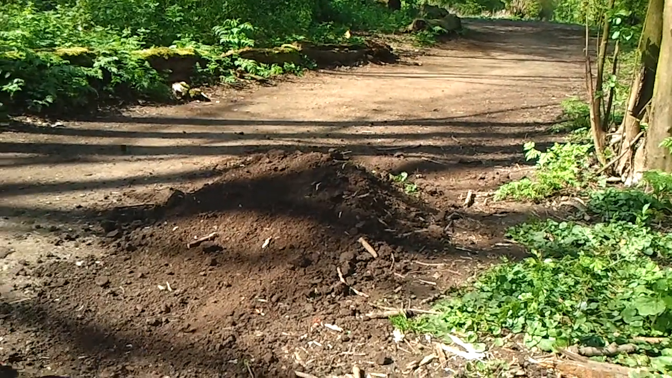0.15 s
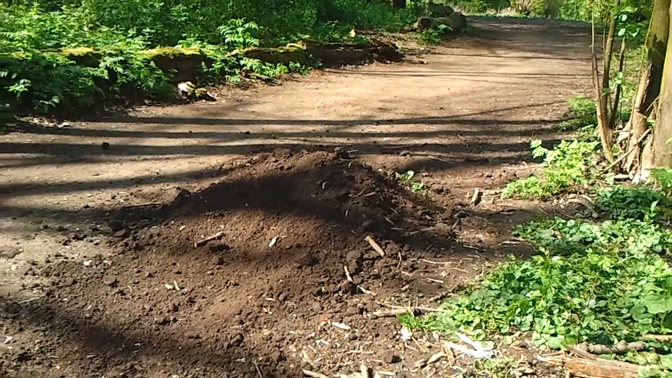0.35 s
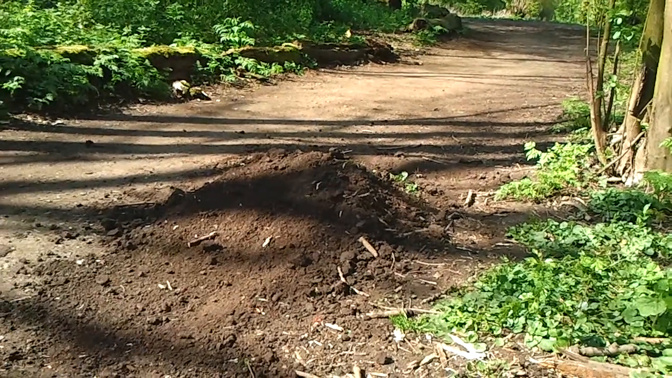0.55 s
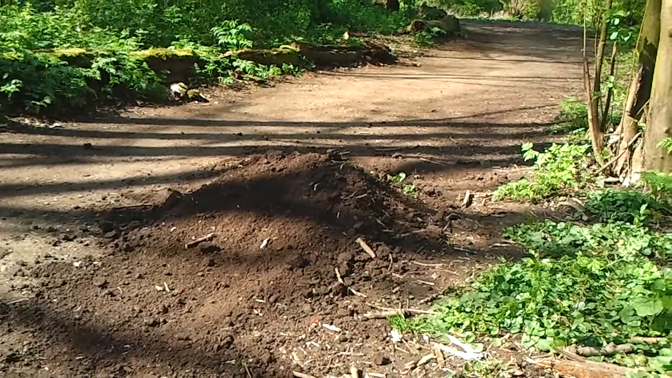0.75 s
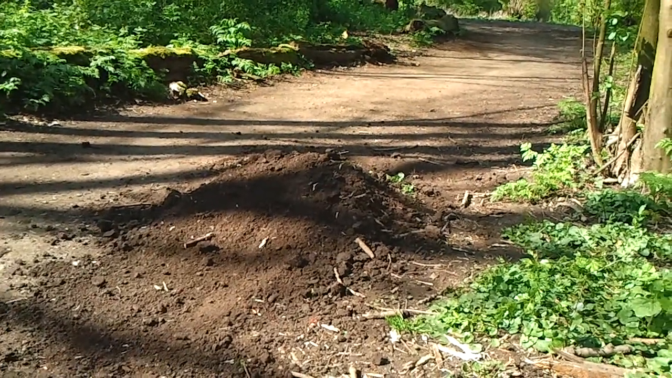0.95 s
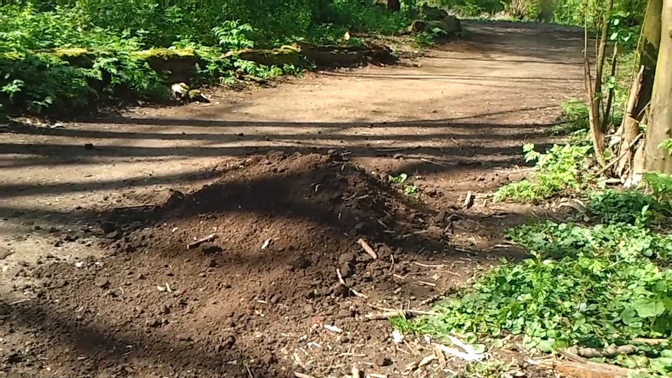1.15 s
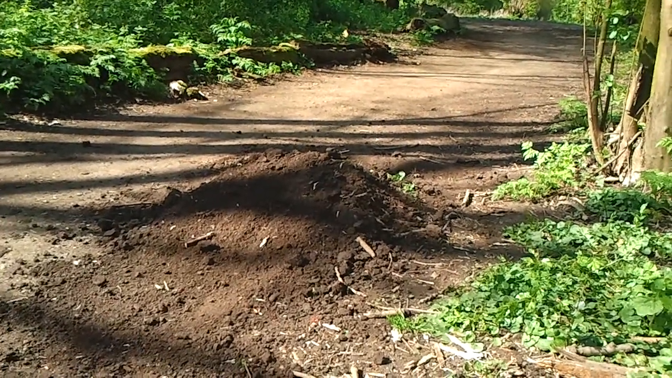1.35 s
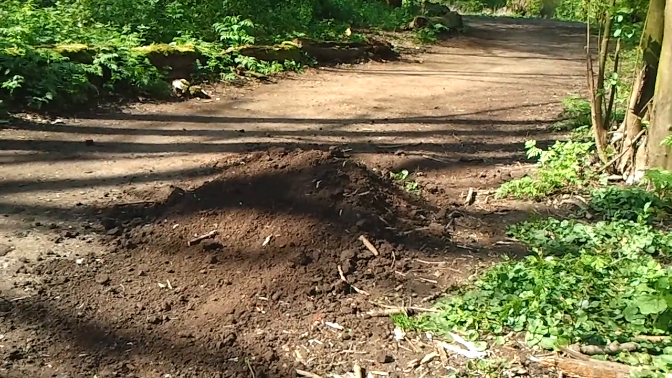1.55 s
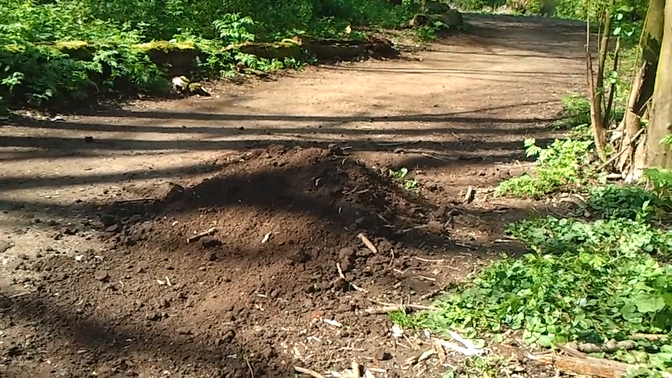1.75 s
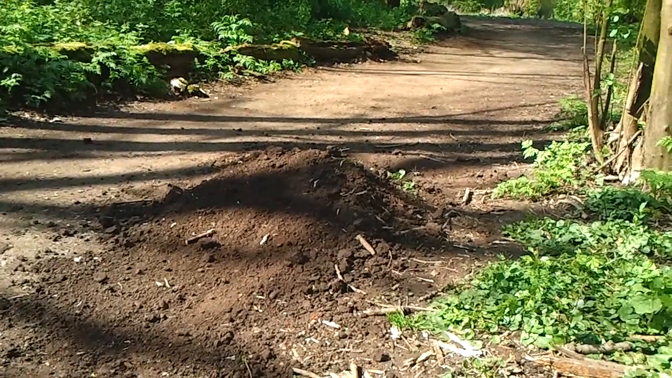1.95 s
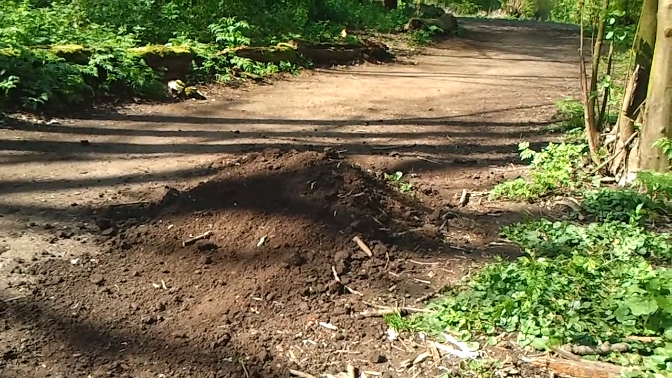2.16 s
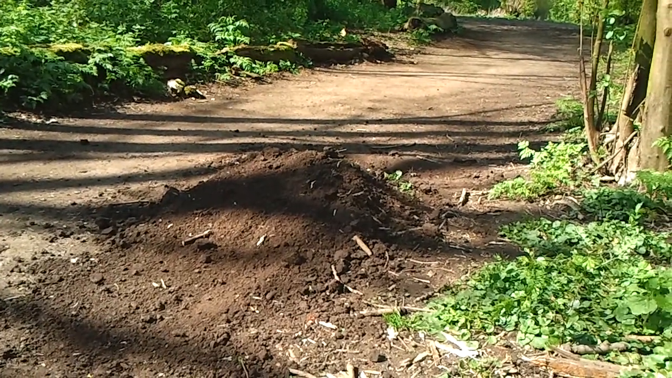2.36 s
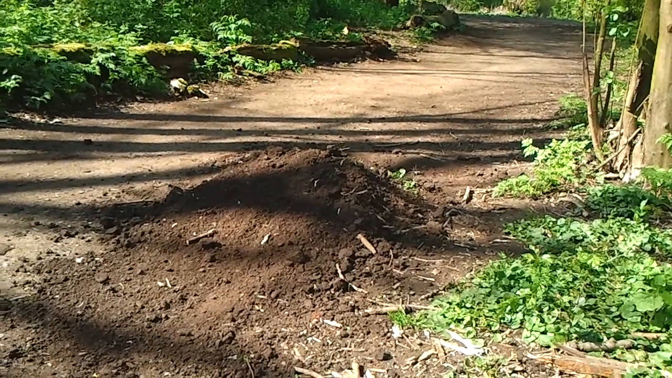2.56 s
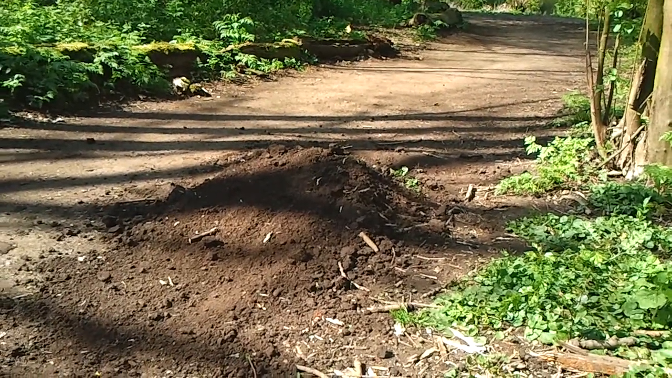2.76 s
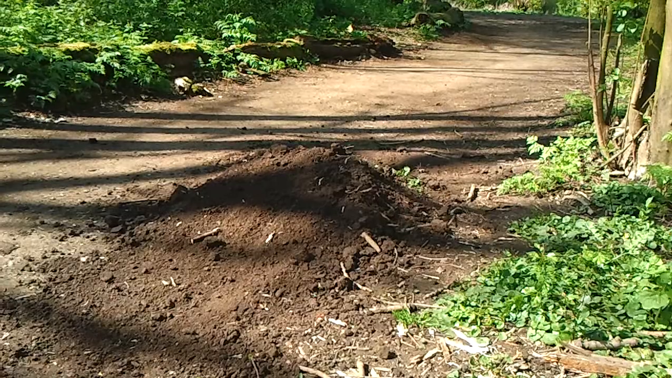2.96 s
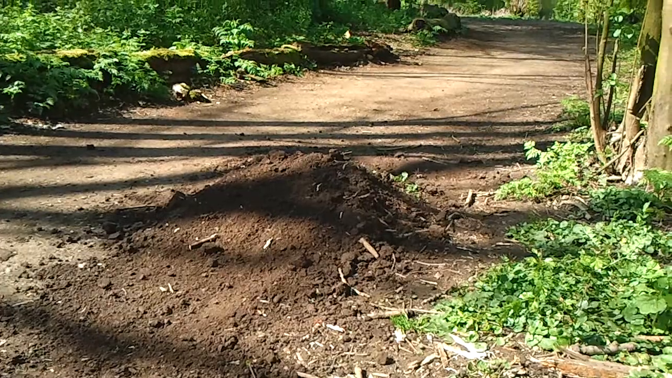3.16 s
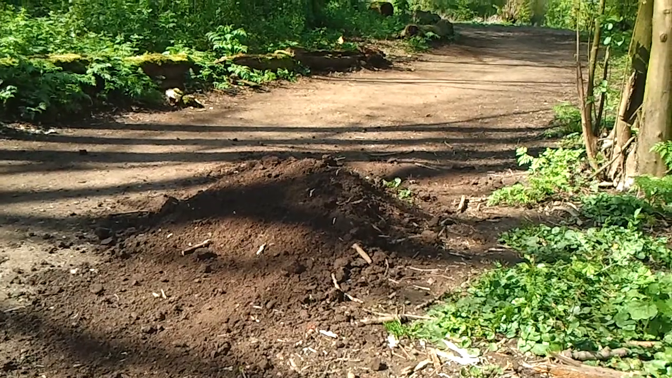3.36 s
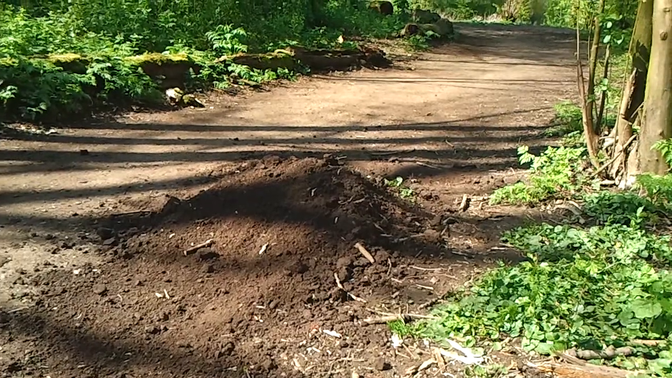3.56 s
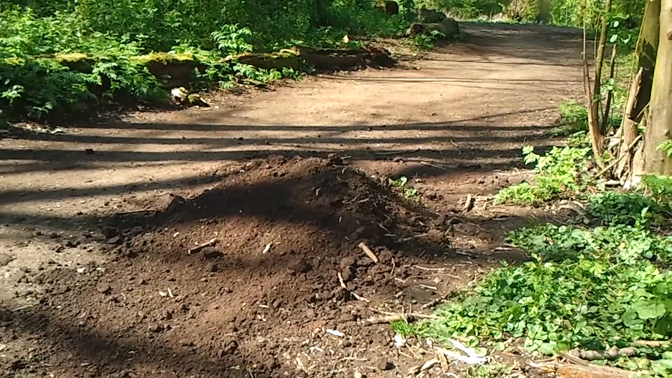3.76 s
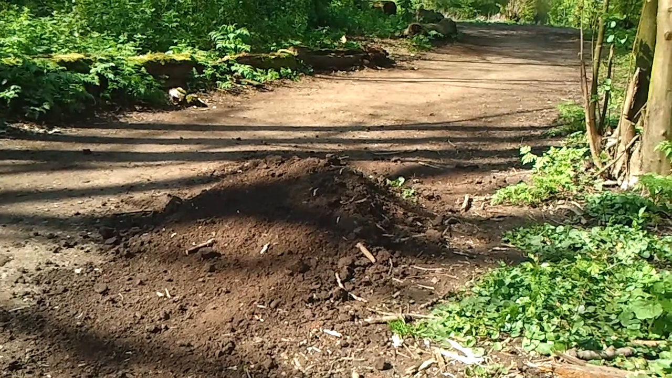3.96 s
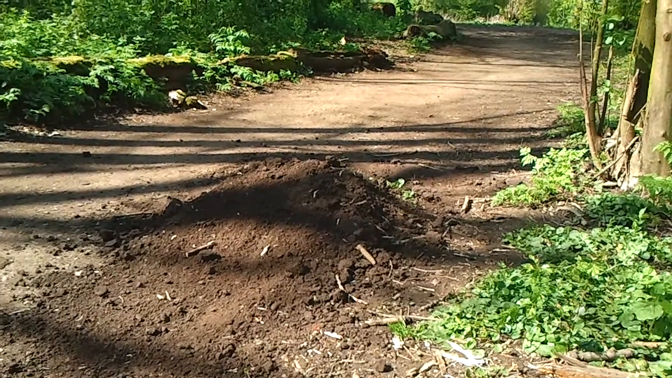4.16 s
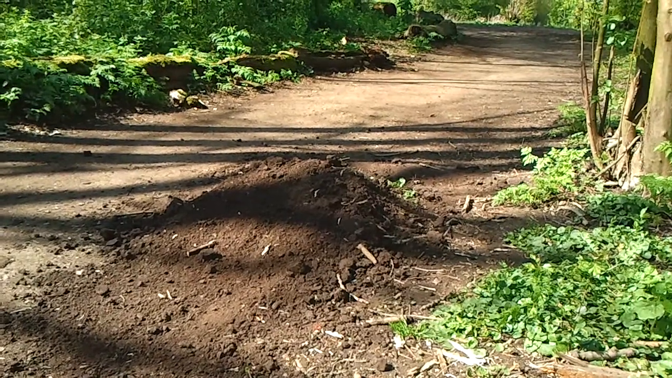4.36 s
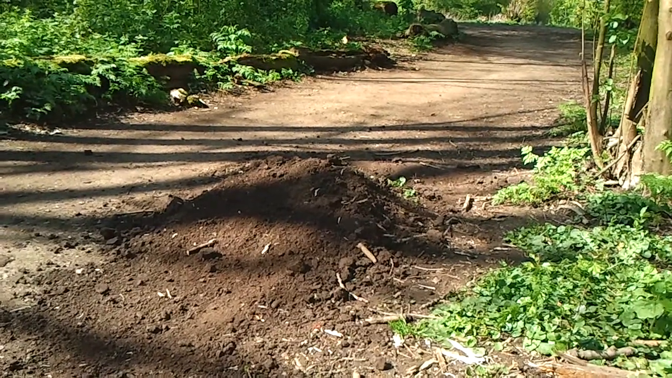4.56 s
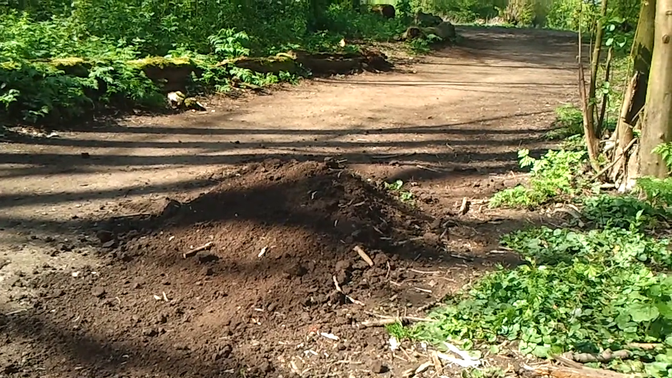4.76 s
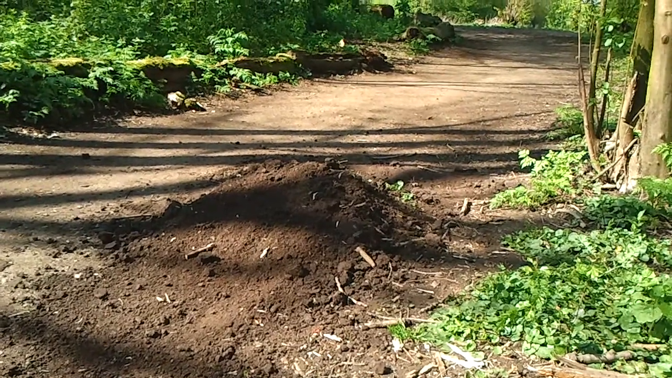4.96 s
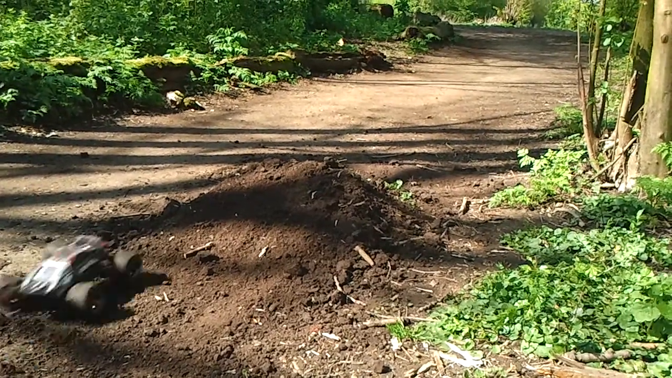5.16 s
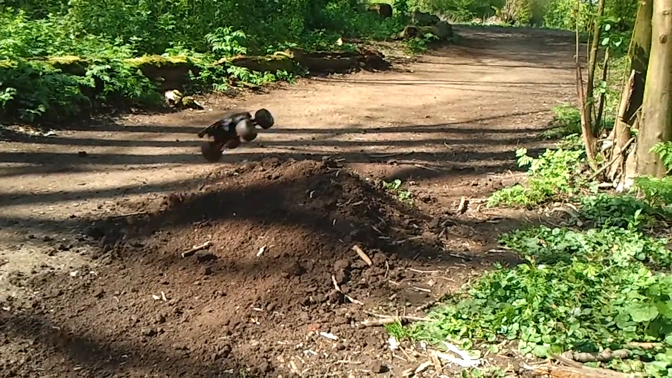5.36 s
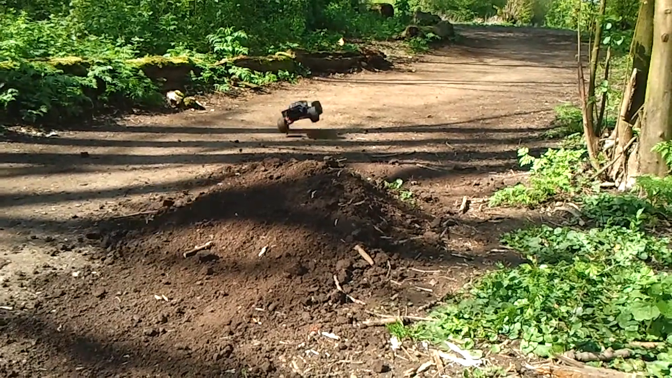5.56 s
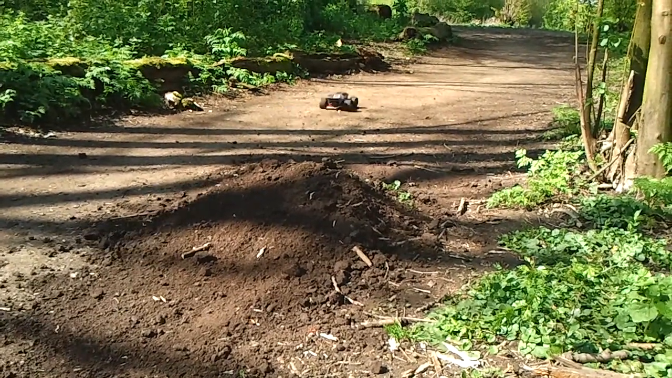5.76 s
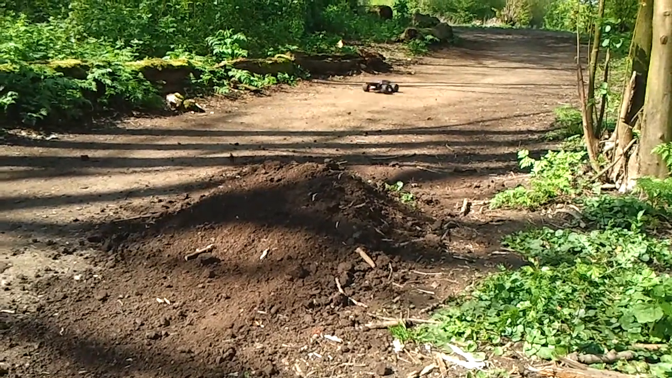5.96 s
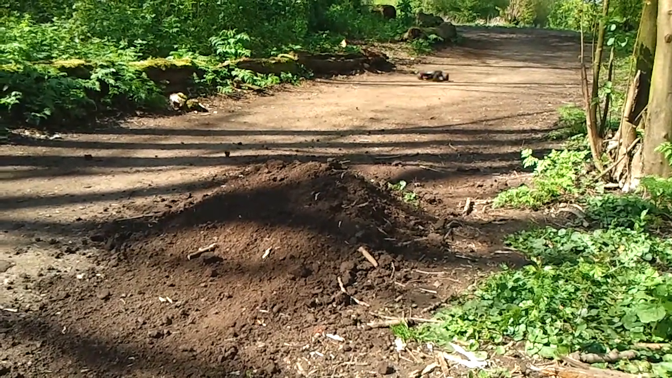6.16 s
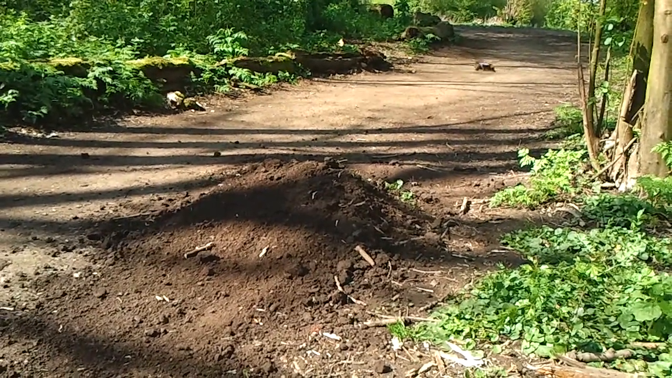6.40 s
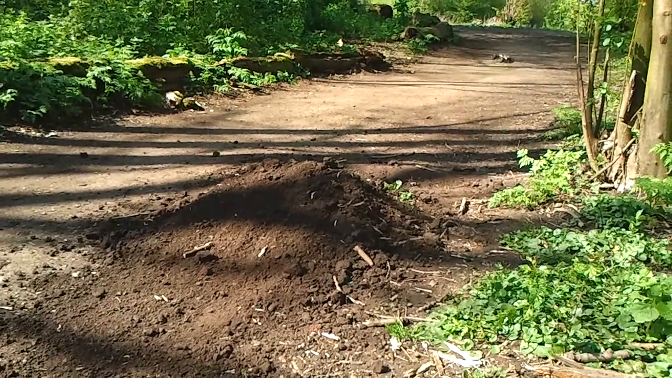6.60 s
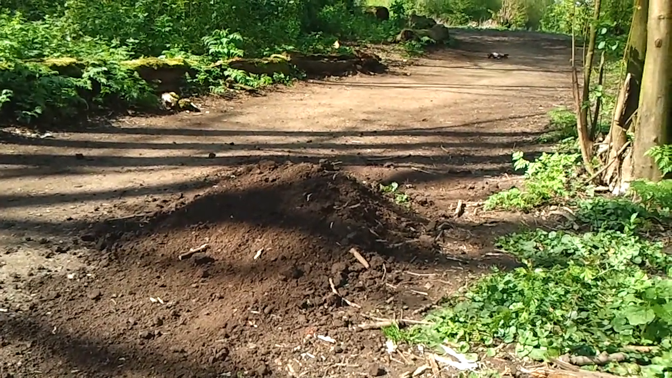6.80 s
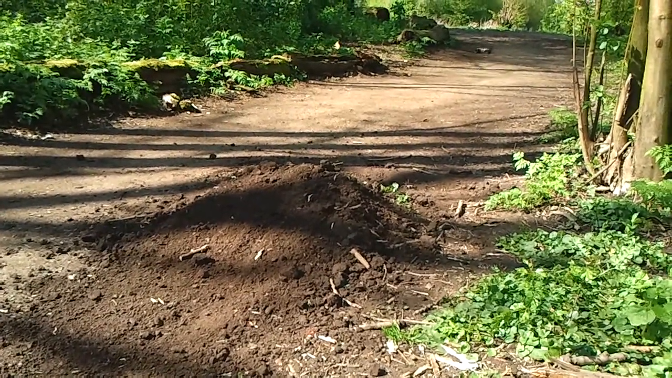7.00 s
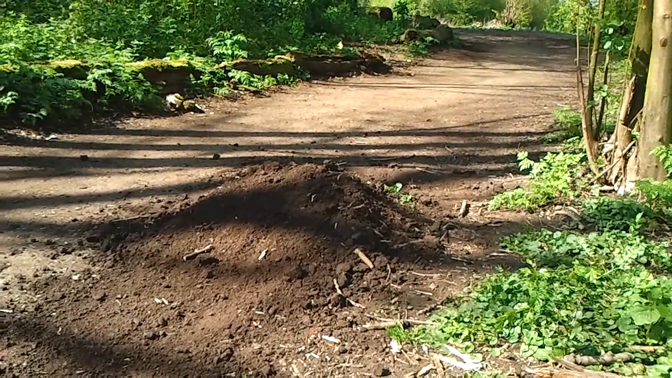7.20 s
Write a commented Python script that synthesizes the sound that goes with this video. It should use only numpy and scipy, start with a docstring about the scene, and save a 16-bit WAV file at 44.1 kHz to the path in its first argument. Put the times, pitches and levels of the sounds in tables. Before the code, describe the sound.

Very close to the microphone on a woodland dirt path, a small electric truck lands with a burst of gear whine and hollow plastic clatter, tumbles and coasts over grit. Faint wavering whines follow as it turns, then a sharp throttle blip with a knock. After a near lull it accelerates, roars past at full whine, jumps, lands with a light thud and speeds off, thinner and distant.

```python
"""A dirt path among trees: an electric radio-controlled truck lands close by, tumbles and coasts off,
turns with blips of throttle, charges past, jumps a mound and races away.
Its gears whine in gliding tones; filtered grains and noise make churned grit, chassis rattle and gear rasp.
Noise bursts make blows, slipping gears and pebbles; short sweeps make a ticking bird, over a low rumble
and puffs of wind."""
import sys
import numpy as np
from scipy import signal
from scipy.fft import rfft, irfft, next_fast_len
from scipy.io import wavfile
from scipy.ndimage import uniform_filter1d

SR = 44100
rng = np.random.default_rng(int(sys.argv[2]) if len(sys.argv) > 2 else 0)


def waveform_to_disk(signal):
    """Save audio, clipped to [-1, 1], as 16-bit WAV at the path in sys.argv[1]."""
    frames = np.transpose(np.atleast_2d(signal))
    scaled = np.clip(frames, -1, 1) * 32767
    samples = np.round(scaled).astype(np.int16)
    wavfile.write(sys.argv[1], SR, samples)


N = 319131
TIME = np.arange(N) / SR


def amp(db):
    """Decibels to gain."""
    return 10 ** (np.asarray(db) / 20)


def unit(x):
    """Scales to rms 1."""
    return x / np.sqrt(np.mean(x ** 2) + 1e-20)


def read(points, hz):
    """Reads a spectrum on a log-frequency axis."""
    f, value = np.transpose(points)
    return np.interp(np.log(hz + 1), np.log(f + 1), value)


def curves(rows, t):
    """Every column of a timed table, interpolated at the times t."""
    s, *columns = np.transpose(rows)
    return [np.interp(t, s, c) for c in columns]


def lift(modes, hz):
    """Gain in dB of a set of resonances at the given frequencies."""
    return sum(db / (1 + (2 * (hz - f) / width) ** 2) for f, width, db in modes)


def add(mix, s, sound):
    """Mixes a sound in at a time in seconds."""
    part = mix[max(round(s * SR), 0):][:len(sound)]
    part += sound[:len(part)]


def wander(n, hz):
    """Smooth random curve of rms 1, up to about hz changes a second."""
    size = next_fast_len(n)
    f = np.fft.rfftfreq(size, 1 / SR)
    spectrum = rfft(rng.standard_normal(size)) / (1 + (f / hz) ** 4)
    return unit(irfft(spectrum, size)[:n])


def band(x, lo_hz, hi_hz, order=2):
    """Band-pass filter."""
    sos = signal.butter(order, [lo_hz, min(hi_hz, .45 * SR)], "band", fs=SR, output="sos")
    return signal.sosfilt(sos, x)


def grains(per_s, spread_db):
    """Random clicks: many small, a few large."""
    size = amp(spread_db * np.minimum(rng.exponential(1, N), 4))
    return unit(size * rng.choice([-1, 1], N) * (rng.random(N) < per_s / SR))


# The motor in each throttle burst; the drive sets gear rasp and chassis rattle together.
# Each row: time in seconds, gear mesh in Hz, whine level in dB before the gear-case response, drive in dB.
LANDING = [(0, 926, -33.5, -24), (.075, 1031, -31, -26), (.14, 1591, -35, -25.5),
           (.165, 3437, -24.5, -18.5), (.2, 2964, -31.5, -23.5), (.25, 3064, -22.5, -24.5),
           (.29, 2964, -34, -27.5), (.33, 2600, -30.5, -37), (.42, 2280, -49, -31)]
TURN = [(1.033, 1786, -39, -38), (1.07, 1413, -33.5, -41), (1.144, 2413, -40, -34),
        (1.192, 1880, -41, -36.5), (1.256, 2122, -34.5, -40), (1.291, 1710, -41, -38),
        (1.379, 1868, -34.5, -38.5), (1.5, 1760, -34.5, -39), (1.565, 1622, -30, -37.5),
        (1.599, 2190, -31.5, -36.5), (1.63, 1640, -28.5, -38.5), (1.664, 1914, -40, -41.5)]
BLIP = [(1.99, 2234, -34, -36), (2.013, 1421, -29.5, -38.5), (2.041, 1790, -32, -37),
        (2.115, 1908, -29, -29), (2.139, 2480, -29, -25), (2.151, 3243, -14, -24.5),
        (2.17, 3023, -18, -25.5), (2.195, 3445, -30, -25), (2.214, 2970, -21, -32), (2.265, 2450, -46, -32)]
RUN_UP = [(3.985, 1247, -45.5, -45.5), (4.1, 1311, -45.5, -43), (4.2, 1501, -44, -43),
          (4.34, 1832, -44.5, -42), (4.589, 2056, -41, -37.5), (4.68, 2350, -41, -29.5),
          (4.755, 2790, -38, -28.5), (4.795, 2640, -26.5, -27.5), (4.849, 3127, -26, -21),
          (4.957, 4120, -20.5, -17)]
JUMP = [(4.945, 4354, -15, -18), (4.995, 4075, -17.5, -17), (5.051, 3383, -12.5, -16),
        (5.11, 3786, -14.5, -17), (5.151, 3254, -21, -18), (5.24, 3097, -18.5, -19.5),
        (5.321, 2892, -29, -26), (5.382, 3490, -26.5, -33), (5.48, 3188, -32, -32),
        (5.562, 3260, -35, -30.5), (5.741, 2970, -61, -37)]
AWAY_RUN = [(5.76, 2465, -51.5, -35.5), (6.14, 2427, -48, -35), (6.2, 2921, -34, -31),
            (6.379, 3880, -39, -33), (6.51, 3823, -30, -34.5), (6.556, 4010, -22.5, -35.5),
            (6.6, 4302, -30, -30.5), (6.75, 4543, -27.5, -31), (6.86, 4440, -30, -34),
            (6.92, 4300, -50, -37), (7.2, 3670, -67, -47)]
# How roughly the ground treats the drive train. One value from 0 to 1 for each burst, in the order above.
ROUGHNESS = [.8, .06, .1, .5, 1.0, .22]
# Weaker tones of the drive train.
# Each row: multiple of the mesh rate, level in dB against the mesh tone before the resonances.
GEAR_ORDERS = [(0.423, -20), (.5, -22.5), (0.601, -20.5), (0.749, -17.5), (1.15, -15)]
# Shell panels that ring when a weak tone meets them. Each row: centre in Hz, width in Hz, lift in dB.
PANELS = [(1110, 75, 10.5), (1628, 77, 14)]
# How well the gear case radiates a tone, so that each swells as it glides through a resonance.
# Each row: frequency in Hz, gain in dB.
GEAR_RING = [(800, 0), (1000, 11.5), (1300, -5.5), (1720, -2.5), (2200, 0), (2600, -2.5), (3100, -9),
             (3600, -3.5), (4400, -6), (5000, -7), (5600, 4), (6300, 8), (7200, -1.5), (8200, 1)]
PINION_TEETH, TEETH_PER_WHEEL_TURN = 13, 62
SECOND_STAGE = 1.37  # rate of the second gear stage, as a multiple of the mesh


def whine(rows, rough, octave_db, stage_db, fuzz=1.0, runout=0.28, stage_octave_db=-8,
          behind_db=-14, shade_hz=4000, patchy_db=5.0):
    """Teeth meet at the mesh rate; bumps and wheel turns shake speed and load, the pinion throbs the tone."""
    t = np.arange(rows[0][0], rows[-1][0], 1 / SR)
    n = len(t)
    hz, whine_db, _ = curves(rows, t)
    wheel = np.sin(2 * np.pi * np.cumsum(hz) / SR / TEETH_PER_WHEEL_TURN + 0.67 * wander(n, 12))
    flutter = .02 * wander(n, 35) + .01 * wander(n, 150) + .015 * wheel
    # the drive binds once a wheel turn, most at low speed
    binding = wheel * np.minimum(2000 / hz, 1) ** 2
    binding_db, sag = 3.5 * binding, .01 * binding
    phase = 2 * np.pi * np.cumsum(hz * (1 + rough * flutter + sag)) / SR

    tones = [(1, 0), (2, octave_db + binding_db)]
    tones += [(SECOND_STAGE, stage_db), (2 * SECOND_STAGE, stage_db + stage_octave_db)]
    tones += [(k, db + lift(PANELS, k * hz)) for k, db in GEAR_ORDERS]
    away = leaving(t)
    out = np.zeros(n)
    for k, db in tones:
        backlash = 1 + rough * fuzz * (wander(n, 180) + 1j * wander(n, 200))
        throb = 1 + runout * np.cos(phase / PINION_TEETH + 2 * np.pi * rng.random())
        load = amp(binding_db + patchy_db * np.sqrt(rough) * np.tanh(wander(n, 27)))
        # per octave: the body hides high tones from behind
        shade_db = behind_db * np.maximum(np.log2(k * hz / shade_hz), 0)
        ring_db = read(GEAR_RING, k * hz) * (1 - away) + shade_db * away
        tone = unit((backlash * np.exp(1j * k * phase)).real * throb * load)
        out += amp(whine_db + db + ring_db) * tone
    return t[0], out * signal.windows.tukey(n, .04)


# The speed controller sings at part throttle. Each row: start in seconds, length in seconds, level in dB.
SINGING = [(1.3, 0.28, -45.5), (3.955, 0.32, -43.5)]
CHOPPER_HZ = 3050


def chopper(octave_db=-17, load_db=4.0):
    """Switched current makes the motor windings sing at a nearly fixed pitch; the current swells at random."""
    phase = 2 * np.pi * CHOPPER_HZ * TIME + .5 * wander(N, 30)
    current = amp(load_db * wander(N, 45))
    gate = np.zeros(N)
    for s, length, db in SINGING:
        add(gate, s, amp(db) * signal.windows.tukey(round(length * SR), .3))
    return gate * unit(current * (np.sin(phase) + amp(octave_db) * np.sin(2 * phase)))


# Colour of the running noise in each pose. Each row: frequency in Hz, relative level in dB per Hz.
CLOSE = [(59, -46), (100, -27.5), (270, -5), (550, -9.5), (651, 1), (742, -4.5), (1060, -7), (2700, -5.5),
         (3450, -4), (5200, -4), (6390, 1.5), (8790, -10), (11400, -62.5), (19300, -120)]
TURNING = [(59, -45), (100, -10), (151, -7.5), (270, -12), (407, -7.5), (456, -2.5), (929, -4), (1380, -3),
           (1930, 2), (2370, -6), (3710, -18), (4310, -27), (6270, -12.5), (7150, -20.5), (8790, -42.5),
           (11400, -78), (19300, -120)]
COASTING = [(59, -52), (100, -15), (157, -1), (255, -9.5), (378, -5), (447, -6), (715, -2.5), (878, -3.5),
            (964, -4), (1040, -3.5), (2080, 0.5), (4080, -21), (5820, -17.5), (6510, -15.5), (8790, -32),
            (11400, -76), (19300, -120)]
AWAY = [(59, -31), (100, -17), (224, -14), (275, -10.5), (728, -5.5), (1280, -16.5), (1660, -13),
        (2080, -23), (2700, -14), (3510, -7), (3860, -5), (4480, -12.5), (4740, -12.5), (6510, -16),
        (8790, -25.5), (11400, -71), (19300, -120)]
# Resonances of the tyres, body shell and gear case. Each row: centre in Hz, width in Hz, lift or cut in dB.
CASE = [(425.6, 51, 4), (1095, 290, 5), (3780, 660, 6.5), (6435, 690, -10)]


def running(bursts, mesh_hz, shake_db=1.29, chatter=0.16, low_hz=800, high_hz=2800,
            patchy_db=2.7, ripple_db=1.95, ruts_db=1.86):
    """Grit under the tyres, loose parts shaken by bumps, and gear teeth scraping once a motor turn."""
    bumps = amp(shake_db * wander(N, 57))
    turns = np.cumsum(mesh_hz) / SR / PINION_TEETH
    scrape = 1 + chatter * np.cos(2 * np.pi * turns)
    tyres = unit(grains(2500, 3.33) * bumps * amp(ruts_db * wander(N, 21)))
    chassis = unit((grains(1800, 2.5) + 0.84 * rng.standard_normal(N)) * bumps)
    rasp = unit((grains(3000, 2.6) + 1.2 * rng.standard_normal(N)) * bumps * scrape)
    hz, t, z = signal.stft(np.array([tyres, chassis, rasp]), SR, nperseg=512, noverlap=384)

    gains, shares = work(bursts, t)
    poses = (CLOSE, TURNING, COASTING, AWAY)
    colour_db = sum(np.outer(read(c, hz), share) for c, share in zip(poses, shares))
    colour_db = colour_db + np.outer(lift(CASE, hz), 1 - shares[3])  # the ringing fades as the truck leaves
    # random short patches and slower ripples vary the colour of the noise
    patches, ripples = rng.standard_normal((2, len(hz), len(t)))
    patches = unit(uniform_filter1d(uniform_filter1d(patches, size=7, axis=1), size=3, axis=0))
    ripples = unit(uniform_filter1d(uniform_filter1d(ripples, size=120, axis=1), size=2, axis=0))
    colour = amp(colour_db + patchy_db * patches + ripple_db * ripples)

    # tyres fill the lows, chassis the middle, rasp the highs
    below, above = 1 / (1 + (hz / low_hz) ** 8), 1 - 1 / (1 + (hz / high_hz) ** 12)
    ranges = (below, (1 - below) * (1 - above), above)
    out = 0
    for source, share, gain in zip(z, ranges, gains):
        body = colour * np.sqrt(share)[:, None]
        out = out + source * gain * body / np.sqrt(np.mean(body ** 2, 0))
    return band(signal.istft(out, SR, nperseg=512, noverlap=384)[1][:N], 110, 16000)


# Level of the rolling wheels, set by speed and distance. Each row: time in seconds, level in dB.
ROLLING = [(0, -37), (.2, -34.5), (.33, -40.5), (.6, -39), (.87, -41.5), (1.01, -51), (1.13, -40),
           (1.4, -43.5), (2.03, -46.5), (2.18, -28.5), (2.33, -42), (3.05, -46), (3.5, -54), (3.95, -55),
           (4.7, -42), (5.1, -20), (5.38, -28.5), (5.85, -40), (6.35, -39.5), (7.24, -44)]
# The tyres dig in and spray dirt. Each row: centre in seconds, half length in seconds, level in dB.
SKIDS = [(0.239, 0.0096, -20.5), (0.355, 0.0096, -31.5), (0.498, 0.033, -31.5), (1.764, 0.016, -39),
         (1.896, .02, -44), (2.26, 0.019, -30), (2.443, 0.012, -36), (4.962, 0.018, -26.5),
         (5.296, 0.011, -38), (5.36, 0.011, -33), (5.44, .01, -36), (5.783, 0.039, -36)]
# Balance in each burst, one row a burst in playing order. Each row: rattle in dB against drive,
# octave in dB against whine, second gear stage in dB against whine.
BALANCE_DB = [(-2, -4, -2.5), (2.5, -9.5, -14.5), (2, -4.5, -16), (-3.5, 0.5, 2.5), (-5.5, -8, -18.5),
              (-6.5, -10, -6)]
# rolling level at which the truck sounds distant, and right beside the listener
FAR_DB, NEAR_DB = -45.5, -31.5
# wheels leave and meet the ground at the jump, and the tyre noise drops meanwhile
TAKE_OFF_S, TOUCH_DOWN_S, AIRBORNE_DB = 5.455, 5.75, -14


def work(bursts, t, loose_db=1.5, grit_db=-2.5, close_grit_db=2.0, spring_s=0.011):
    """Gains of tyres, chassis and gear rasp from rolling plus throttle, and the share of each pose's colour."""
    rolling_db, = curves(ROLLING, t)
    airborne = np.clip(np.minimum(t - TAKE_OFF_S, TOUCH_DOWN_S - t) / spring_s + .5, 0, 1)
    skids = sum(amp(db) * np.exp(-.5 * ((t - s) / length) ** 2) for s, length, db in SKIDS)
    wheels = np.hypot(amp(rolling_db + AIRBORNE_DB * airborne), skids)

    drives = np.array([throttle(rows, t) for rows in bursts])
    drive = drives.max(0)
    rattle = (drives * amp(BALANCE_DB)[:, :1]).max(0)
    close = np.clip((rolling_db - FAR_DB) / (NEAR_DB - FAR_DB), 0, 1)
    away = leaving(t)
    powered = drive ** 2 / (drive ** 2 + wheels ** 2)

    chassis = np.hypot(wheels * amp(loose_db), rattle)
    rasp = np.hypot(wheels * amp(grit_db + close_grit_db * close), drive)
    facing = (1 - away) * np.array([close, (1 - close) * powered, (1 - close) * (1 - powered)])
    return (wheels, chassis, rasp), [*facing, away]


SPIN_UP_DB_PER_S, SPIN_DOWN_DB_PER_S = 1801, 451


def throttle(rows, t):
    """Drive gain of one burst: it comes in fast, follows the motor and dies away on release."""
    early, late = np.maximum(rows[0][0] - t, 0), np.maximum(t - rows[-1][0], 0)
    drive_db = curves(rows, t)[2]
    return amp(drive_db - SPIN_UP_DB_PER_S * early - SPIN_DOWN_DB_PER_S * late)


LEAVE_S = 0.37


def leaving(t):
    """How far the truck has turned its back after take-off (0-1); its resonances fade with it."""
    return np.clip((t - TAKE_OFF_S) / LEAVE_S, 0, 1)


# Blows of the chassis on the ground. Each row: start in seconds, clatter in dB and boom of the shell in dB
# (both before the trims in knock), boom pitch in Hz.
BLOWS = [(.155, 4.5, -33.5, 864), (.169, -17, -28, 1120), (.182, 4, -31, 1080), (0.217, 4, -15, 1030),
         (.233, 2.5, -3, 900), (.249, -14, -18, 961), (.358, -8.5, -24.5, 360), (.466, -15, -24, 366),
         (0.516, -29, -34, 988), (0.632, -13.5, -21.5, 696), (.774, -19, -38, 313), (0.85, -15, -26, 720),
         (1.758, -35, -31.5, 635), (2.203, -1.5, -21, 859), (2.245, -4.5, -17, 462),
         (2.865, -30, -42, 1100), (3.054, -29, -33, 576), (5.332, -23, -25, 720), (5.396, -2, -12, 902),
         (5.765, -22, -26, 700), (5.802, -8.5, -23, 670)]


def knock(s, db, boom_db, boom_hz, t60=0.06, clack_db=-12, shell_db=-1, rise=0.00032):
    """A blow sets loose plastic parts clattering over the hollow boom of shell and tyres."""
    t = np.arange(SR // 4) / SR
    clack = unit(band(rng.standard_normal(len(t)), 730, 5900))
    boom = unit(band(rng.standard_normal(len(t)), boom_hz * 0.82, boom_hz * 1.17))
    fade = amp(-60 * t / max(t60, .01)) * (1 - np.exp(-t / rise))
    return s, fade * (amp(db + clack_db) * clack + amp(boom_db + shell_db) * boom)


# Short chirps of slipping gears (first two rows), then pebbles flung against the shell.
# Each row: start in seconds, peak level in dB before the trim in ping, nominal ring in Hz.
CHIRPS_AND_PEBBLES = [(0.2716, -6, 6200), (0.3301, -9, 5240), (0.5158, -5, 4700), (0.525, -14, 4020),
                      (0.6693, -12.5, 4630), (0.685, -14, 5100), (0.7157, -14.5, 6020), (0.7347, -15, 6000),
                      (0.823, -25, 5730)]


def ping(s, db, hz, t60=0.021, tick=0.21, level_db=-2):
    """Gear slip or pebble: a broad tick and a short, narrow-band ring just below the nominal pitch."""
    t = np.arange(SR // 12) / SR
    ring = unit(band(rng.standard_normal(len(t)), hz * 0.94, hz * 0.943))
    crack = unit(band(rng.standard_normal(len(t)), 770, 4940))
    sound = (ring + tick * crack) * amp(-60 * t / t60) * (1 - np.exp(-t / 0.0012))
    return s, amp(db + level_db) * sound / abs(sound).max()


# First reflections from ground and mound. Each row: delay in seconds, gain as a signed factor.
BOUNCES = [(.0021, 0.081), (.0048, -0.055), (.009, 0.15)]


def ground(x):
    """Close reflections break a gliding tone into swells and gaps."""
    out = x.copy()
    for delay, gain in BOUNCES:
        add(out, delay, gain * x)
    return out / np.sqrt(1 + sum(gain ** 2 for _, gain in BOUNCES))


def trees(x, t60=0.32):
    """Sparse, decaying echoes from trunks and the bank."""
    t = np.arange(SR // 2) / SR
    hits = (rng.random(len(t)) < 1500 / SR) * (t > .012)
    taps = rng.standard_normal(len(t)) * hits * amp(-60 * t / t60)
    return signal.fftconvolve(x, taps / np.linalg.norm(taps))[:N]


# Ticks of a small bird in the bushes. Each row: start in seconds, peak level in dB.
BIRD = [(2.3674, -28), (2.3723, -40), (7.1202, -25), (7.1216, -25)]


def bird(start_hz=6700, end_hz=5100, length=0.0026, echo_db=-3):
    """Each tick is a very short downward sweep that scatters through the wood."""
    t = np.arange(0, length, 1 / SR)
    sweep = np.sin(2 * np.pi * np.cumsum(np.linspace(start_hz, end_hz, len(t))) / SR)
    out = np.zeros(N)
    for s, db in BIRD:
        add(out, s, amp(db) * sweep * np.sin(np.pi * np.sqrt(t / length)))
    return out + amp(echo_db) * trees(out)


# Colour of the woodland background. Each row: frequency in Hz, relative level in dB per Hz.
AIR = [(15, -65.5), (25, -32.5), (60, -8.5), (114, -10), (153, -3.5), (209, -13), (308, -13), (453, -20.5),
       (1050, -14.5), (1280, -16.5), (1370, -26.5), (3790, -36), (8000, -51), (10400, -74), (17600, -120)]
# Puffs of wind on the microphone. Each row: centre in seconds, level in dB, half length in seconds.
PUFFS = [(0.058, -38, 0.027), (0.86, -46, 0.018), (6.588, -41, 0.036), (6.77, -39, 0.0093),
         (7.014, -41.5, 0.017), (7.133, -56, 0.071)]


def woodland(air_db=-51):
    """Steady distant rumble, and lumps of low wind noise on the microphone."""
    size = next_fast_len(N)
    hz = np.fft.rfftfreq(size, 1 / SR)
    air = irfft(rfft(rng.standard_normal(size)) * amp(read(AIR, hz)), size)[:N]
    gusts = sum(amp(db) * np.exp(-((TIME - s) / length) ** 2) for s, db, length in PUFFS)
    wind = unit(band(rng.standard_normal(N), 51, 160, order=3))
    return amp(air_db) * unit(air) + gusts * wind


def scene(echo_db=-15):
    """The truck on the path, among trees."""
    bursts = [LANDING, TURN, BLIP, RUN_UP, JUMP, AWAY_RUN]
    gears, mesh_hz = np.zeros(N), np.zeros(N)
    for rows, rough, (_, octave_db, stage_db) in zip(bursts, ROUGHNESS, BALANCE_DB):
        add(gears, *whine(rows, rough, octave_db, stage_db))
        mesh_hz = np.where(TIME >= rows[0][0], curves(rows, TIME)[0], mesh_hz)
    truck = ground(gears) + chopper()
    for row in BLOWS:
        add(truck, *knock(*row))
    out = truck + amp(echo_db) * trees(truck)
    for row in CHIRPS_AND_PEBBLES:  # close by, so dry
        add(out, *ping(*row))
    return (out + running(bursts, mesh_hz) + bird() + woodland())[None]


# Treble roll-off of the microphone. Each row: frequency in Hz, gain in dB.
MIC = [(0, -1), (6600, 1), (7200, -7), (7900, -18), (8600, -22), (9200, -33.5)]
EDGE_HZ = 8950  # steep upper limit


def record(dry):
    """The microphone clips peaks beyond its range and loses the top treble."""
    size = next_fast_len(N + 2048)
    hz = np.fft.rfftfreq(size, 1 / SR)
    clipped = np.clip(dry, -.73, .73)
    response = amp(np.interp(hz, *np.transpose(MIC)))
    dull = irfft(rfft(clipped, size) * response, size)[:, :N]
    edge = signal.firwin(511, EDGE_HZ, window=("kaiser", 9), fs=SR)
    return signal.oaconvolve(dull, edge[None], "same")


dry = scene()
out = record(dry)
waveform_to_disk(out)
```